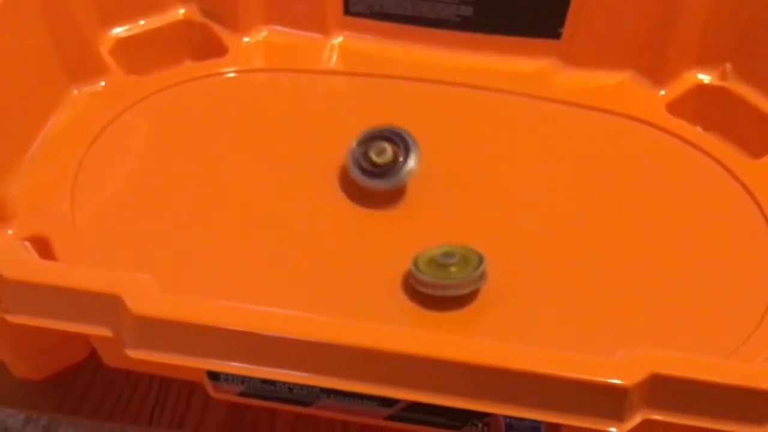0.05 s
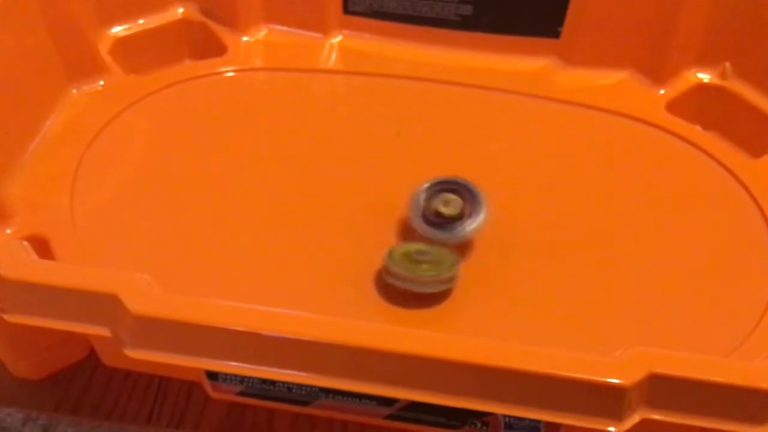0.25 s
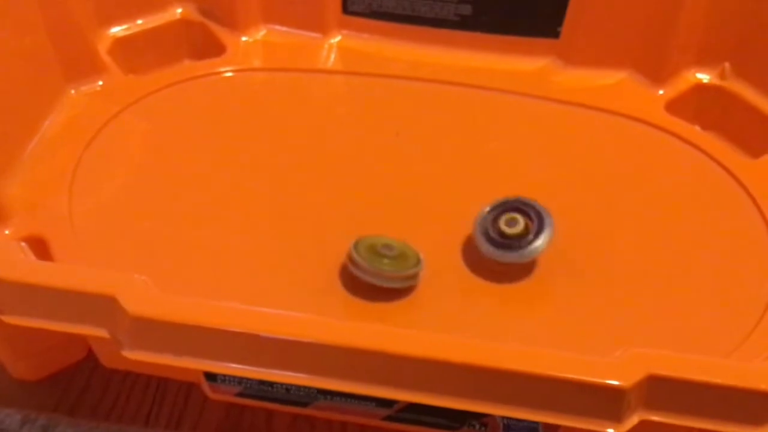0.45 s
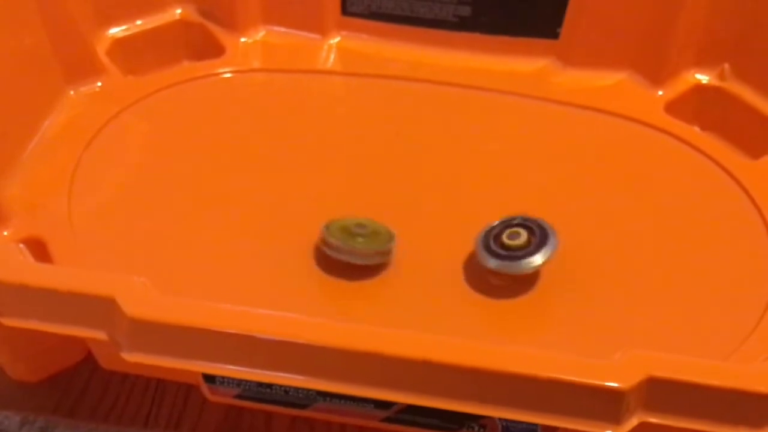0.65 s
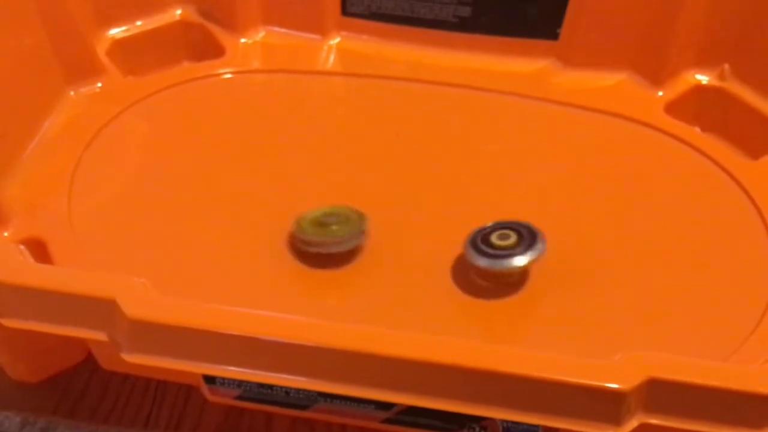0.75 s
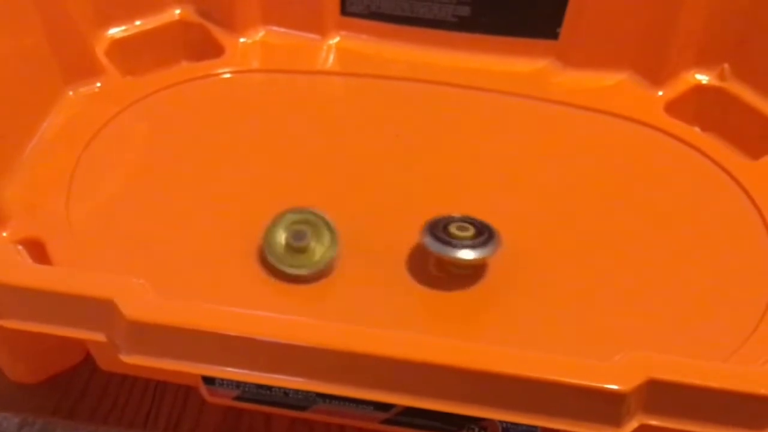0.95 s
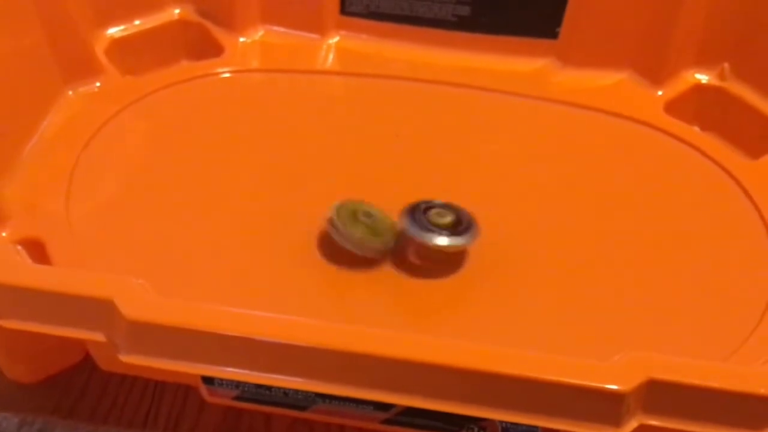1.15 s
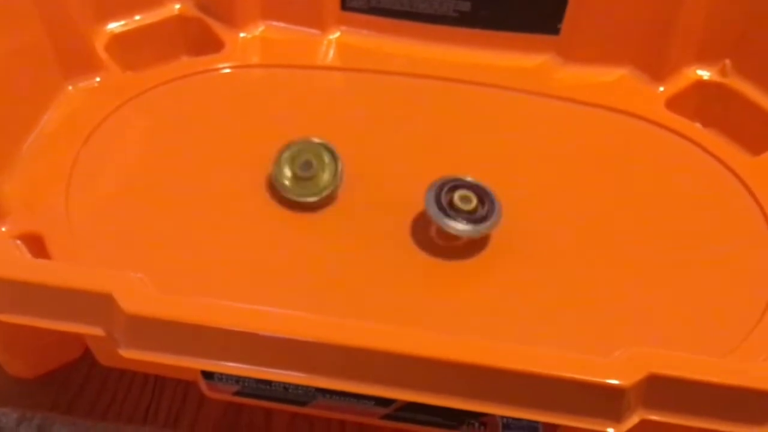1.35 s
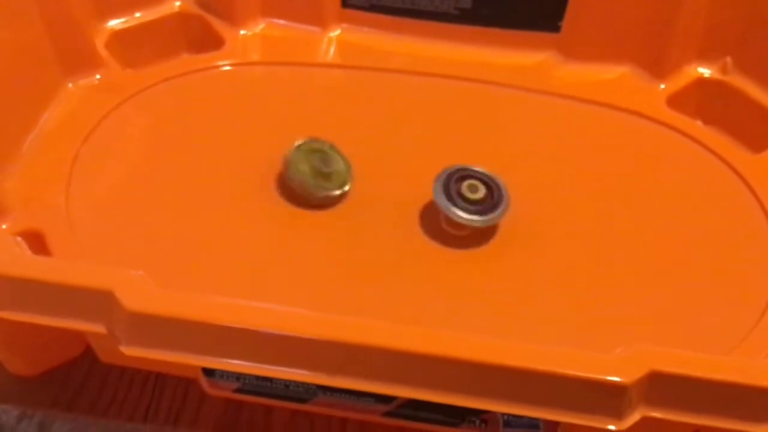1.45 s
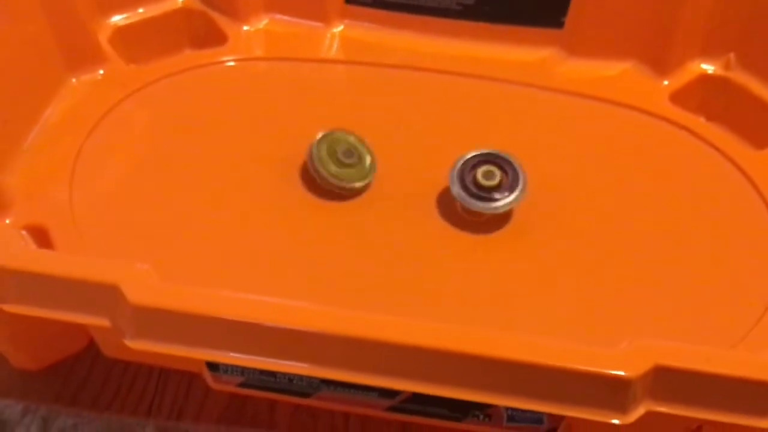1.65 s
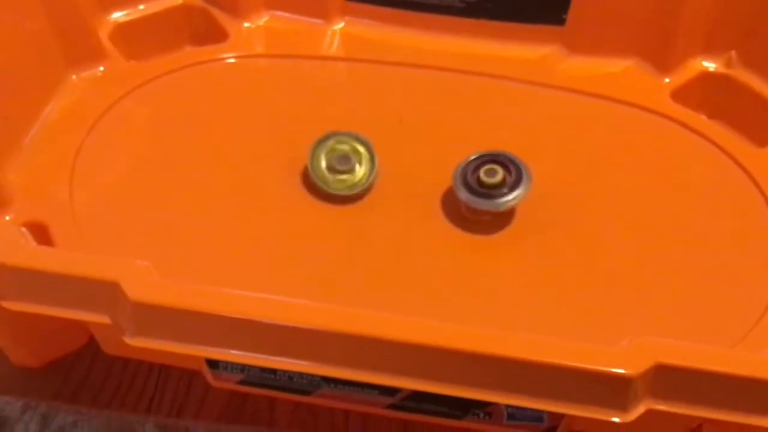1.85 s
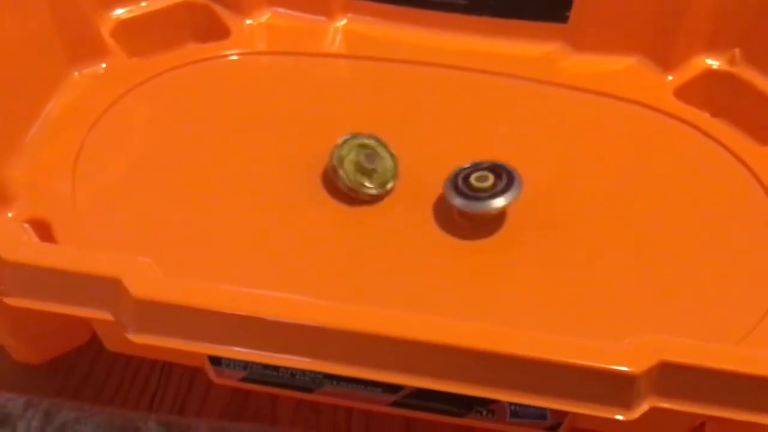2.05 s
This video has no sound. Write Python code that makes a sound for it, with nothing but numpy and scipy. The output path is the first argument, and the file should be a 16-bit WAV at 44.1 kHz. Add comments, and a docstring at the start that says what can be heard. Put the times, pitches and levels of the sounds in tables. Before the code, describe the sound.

Metal-rimmed toy tops clack together, then one grinds on its rim and slows to a rattle.

```python
"""Spinning tops clashing in an arena

Two toy tops with metal rims meet in a thin plastic arena, in a small room with a low hum.
They clash a few times, ringing and knocking the floor. One tips over, chatters, and grinds
round on its rim, biting once a turn and drumming the arena floor. As it slows, the grinding
breaks up into a quick rattle of separate taps."""
import sys
import numpy as np
from scipy import signal
from scipy.fft import rfft, irfft, next_fast_len
from scipy.io import wavfile
from scipy.ndimage import uniform_filter1d, map_coordinates

SR = 44100
rng = np.random.default_rng(int(sys.argv[2]) if len(sys.argv) > 2 else 0)


def persist_wave(psi):
    """Save psi, clipped to +-1, as 16-bit WAV."""
    counts = np.round(np.clip(psi, -1, 1) * 32767).astype(np.int16)
    wavfile.write(sys.argv[1], SR, np.atleast_2d(counts).T)


N = 92610
T = np.arange(N) / SR
BRIEF = T[:2048]  # time axis of one impact
# treble spectrum of the metal rim: f/Hz, level/dB
RIM_SHEEN = [(4000, -35), (6400, -10.5), (7900, -7.5), (8400, 8.5), (9100, -6.5), (10000, -11), (12000, -8),
             (13300, -1), (15800, -4.5)]


def amp(db):
    """Decibels to gain."""
    return 10 ** (np.asarray(db) / 20)


def unit(x):
    """Scale to rms 1."""
    return x / np.sqrt(np.mean(x ** 2) + 1e-20)


def along(points, hz):
    """Interpolate (f/Hz, value) points on a log axis."""
    f, v = np.transpose(points)
    return np.interp(np.log(hz + 1), np.log(f + 1), v)


def curve(rows):
    """Interpolate (t/s, value) points per sample."""
    return np.interp(T, *np.transpose(rows))


def wobble(knots_per_s):
    """Smooth random curve."""
    return map_coordinates(rng.standard_normal(4096), [T * knots_per_s + 2], mode="wrap")


def coloured(x, spectrum):
    """Minimum-phase filter; output at rms 1."""
    m = 2 * next_fast_len(len(x))
    cepstrum = irfft(np.log(amp(along(spectrum, np.fft.rfftfreq(m, 1 / SR)))), m)
    cepstrum[1:m // 2] *= 2
    cepstrum[m // 2 + 1:] = 0
    return unit(irfft(rfft(x, m) * np.exp(rfft(cepstrum)), m)[:len(x)])


def resonance(x, hz, width_hz):
    """One resonance; a second, wider stage steepens the skirts."""
    for spread in (1, 5):
        x = signal.lfilter(*signal.iirpeak(hz, hz / (spread * width_hz), SR), x)
    return x


def steadied(x, window_s):
    """Divide by the running rms."""
    power = uniform_filter1d(x * x, max(2, int(window_s * SR)))
    return x / np.sqrt(np.abs(power) + 1e-12)


def burst(spectrum, envelope):
    """Coloured noise burst with the energy of its envelope."""
    x = coloured(rng.standard_normal(len(envelope)) * envelope, spectrum)
    return x * np.sqrt(np.mean(envelope ** 2))


def swell(peak_s, sharp=1):
    """Envelope: rises to 1 at peak_s, then decays."""
    u = BRIEF / peak_s
    return (u * np.exp(1 - u)) ** sharp


def add(out, start_s, x):
    """Mix x into out."""
    part = out[max(0, round(start_s * SR)):][:len(x)]
    part += x[:len(part)]


def contact(t, rise_s=0.0012, fall_s=0.0048):
    """Force of one rim touch, t seconds after landing."""
    return np.minimum(t / rise_s, 1) * np.exp(-np.square(t / fall_s))


def room_hum(level_db=-49.5):
    """Steady low noise of the room."""
    # hum: f/Hz, level/dB
    spectrum = [(22, -51), (40, -31), (57, -1), (75, -2), (120, -3), (300, -10.5), (1500, -40), (5000, -61),
                (7000, -65), (16000, -60)]
    return amp(level_db) * coloured(rng.standard_normal(N), spectrum)


def echoes(x, walls_db=-16.5, tail_db=-13):
    """Early echoes off the arena walls, then the room's soft tail."""
    # room decay: f/Hz, T60/s
    t60 = [(100, 1), (1000, 0.28), (4000, 0.39), (14000, 0.45)]
    # tail at onset: f/Hz, level/dB
    spectrum = [(100, 2.5), (1000, 1.5), (4000, -3.5), (8500, 1.5), (12000, -4), (16000, -15)]
    hz, t, noise = signal.stft(rng.standard_normal(SR // 2), SR, nperseg=256)
    decay_db = along(spectrum, hz)[:, None] - 60 * t / along(t60, hz)[:, None]
    tail = signal.istft(noise * amp(decay_db), SR, nperseg=256)[1]
    tail *= np.minimum(T[:len(tail)] / 0.0021, 1)
    walls = rng.standard_normal(len(BRIEF)) * swell(0.0032)
    response = amp(tail_db) * tail / np.linalg.norm(tail)
    add(response, 0, amp(walls_db) * walls / np.linalg.norm(walls))
    return signal.fftconvolve(x, response)[:N]


def drumming():
    """Lowest mode of the arena floor, kept going by the tops."""
    # floor mode: t/s, level/dB
    levels = [(0, -52.5), (.23, -55.5), (.27, -39.5), (.36, -41), (.41, -47), (.48, -35.5), (.56, -75),
              (.73, -48.5), (.9, -52), (1.08, -34), (1.16, -45.5), (1.27, -34), (1.4, -42), (1.55, -35.5),
              (1.64, -52), (2.1, -50.5)]
    mode = resonance(rng.standard_normal(N), hz=159.8, width_hz=14.6)
    return amp(curve(levels)) * steadied(mode, 0.027)


def thuds():
    """Dull bumps of a top dropping back on the thin floor."""
    # landings: t/s, level/dB
    landings = [(0.2534, -38), (0.2872, -26.5), (.329, -31.5), (.366, -40), (1.502, -32.5), (1.943, -37),
                (2.084, -40.5)]
    # floor bump: f/Hz, level/dB
    spectrum = [(25, -42), (60, -1), (130, -4.5), (260, 2.5), (450, -8.5), (700, -11), (1400, -25),
                (6000, -62)]
    out = np.zeros(N)
    for start_s, db in landings:
        add(out, start_s, amp(db) * burst(spectrum, swell(0.0017, sharp=0.63)))
    return out


def chatter(bounces_per_s=480, peak_db=-26):
    """Fast uneven bounces swell into a short squeal of one resonance of the top."""
    start_s, peak_s, end_s = 0.601, 0.646, 0.663
    count = np.floor(np.cumsum(bounces_per_s * np.exp(0.28 * wobble(180))) / SR)
    bounces = np.diff(count, prepend=0) * amp(2.9 * wobble(200))
    ring = resonance(bounces, hz=3520, width_hz=120)
    swell_db = np.interp(T, (start_s, peak_s, end_s), (-9.5, 0, -4), left=-120, right=-120)
    return amp(peak_db + swell_db) * steadied(ring, 0.0085)


def taps(thump_delay_s=0.00202):
    """Each rim tap clicks and briefly rings the top; the arena answers with a soft thump."""
    # rim on floor: t/s, level/dB
    hits = [(.079, -41), (.096, -45.5), (.138, -42.5), (.423, -32.5), (.528, -34), (.545, -36), (.561, -34),
            (.570, -28.5), (.581, -31.5), (.666, -28), (.675, -26.5), (.687, -26.5), (.710, -26.5),
            (.721, -30), (.734, -29), (.746, -32), (.774, -34), (.783, -29.5), (.794, -27), (.810, -35),
            (.836, -30.5), (.868, -32), (.879, -28.5), (.926, -29), (1.024, -27), (1.058, -23.5),
            (1.074, -33), (1.082, -33.5), (1.093, -27), (1.148, -31), (1.163, -31), (1.175, -26),
            (1.191, -26.5), (1.204, -29), (1.222, -29.5), (1.235, -30), (1.246, -25), (1.258, -34),
            (1.271, -31), (1.290, -29.5), (1.302, -31), (1.3146, -27.5), (1.324, -36), (1.34, -32.5),
            (1.35, -30), (1.364, -34.5), (1.376, -35), (1.385, -32), (1.394, -28), (1.404, -29.5),
            (1.429, -35.5), (1.442, -36), (1.452, -35.5), (1.464, -33.5), (1.479, -34), (1.496, -36),
            (1.510, -38.5), (1.524, -36), (1.543, -34), (1.571, -38), (1.599, -43), (1.624, -46),
            (1.653, -48), (1.690, -39), (1.725, -38), (1.764, -36.5), (1.788, -35.5), (1.813, -37.5),
            (1.842, -36.5), (1.868, -40), (1.891, -38), (1.919, -34), (1.939, -34), (1.9695, -31.5),
            (1.9905, -34.5), (2.012, -34.5), (2.033, -43), (2.048, -40.5), (2.063, -44.5)]
    # timbre as the contact point shifts: t/s, sheen trim/dB, ring re tap/dB, ring f/Hz
    timbre = [(.42, -12, -7.5, 3740), (.55, 17.5, 2, 4400), (.68, 2, -10, 3530), (.79, -2, 3.5, 4770),
              (.92, 2, -12, 3460), (1.08, 4.5, 1.5, 4500), (1.18, -4, 1, 3580), (1.27, -0.5, -6, 4280),
              (1.94, 3.5, -13, 3680), (1.975, -4, 5.5, 3570)]
    # rim click: f/Hz, level/dB
    click_spectrum = [(400, -13), (1200, -5), (2000, -12), (2900, -5), (3600, 1), (4100, -0.5),
                      (4650, -1.5), (5400, -11.5), (6400, -28.5), (9000, -27.5), (16000, -69)]
    # arena thump: f/Hz, level/dB
    thump_spectrum = [(25, -18), (60, -27), (230, 5.5), (450, -10), (680, -7.5), (900, -12.5),
                      (1200, -10.5), (1800, -21), (6000, -49.5)]
    out = np.zeros(N)
    force = contact(BRIEF)
    times_s, *columns = np.transpose(timbre)
    for start_s, db in hits:
        trim_db, ring_db, ring_hz = (np.interp(start_s, times_s, c) for c in columns)
        tone = np.sin(2 * np.pi * ring_hz * rng.normal(1, 0.008) * BRIEF)
        ring = amp(ring_db) * swell(0.00083, sharp=0.81) * tone
        click = burst(click_spectrum, force)
        sheen = amp(trim_db - 22) * burst(RIM_SHEEN, force)
        add(out, start_s, amp(db) * (click + ring + sheen))
        thump_db = -44.5 + 0.44 * (db + 38)  # grows more slowly than the tap
        add(out, start_s + thump_delay_s, amp(thump_db) * burst(thump_spectrum, swell(0.0033)))
    return out


def grit(spiky_db):
    """Rough contact: noise with a fast level flicker, rms 1."""
    return unit(rng.standard_normal(N) * amp(spiky_db * np.tanh(wobble(700))))


def rim_pressure(bite_at_s=0.879, scatter_db=3.5):
    """The rim bears down once a turn, unevenly, and rubs in between."""
    # spin: t/s, rate/(turns/s)
    spin = [(0, 104), (.6, 97), (.8, 96.5), (.9, 93.6), (1.08, 84), (1.25, 81), (1.4, 78), (1.52, 64),
            (1.6, 48), (2.1, 57)]
    # rubbing between bites: t/s, level/dB
    rubbing = [(.7, -8.5), (.78, -2), (1.0, -3), (1.22, -7.5)]
    turns_per_s = curve(spin)
    turns = np.cumsum(turns_per_s * (1 + 0.006 * wobble(60.8))) / SR
    turns -= np.interp(bite_at_s, T, turns)
    strength = amp(scatter_db * rng.uniform(-1.3, 1, size=512))[np.floor(turns).astype(int)]
    return strength * contact(turns % 1 / turns_per_s) + amp(curve(rubbing))


def rolling(pressure, even_at_s=0.99, even_half_width_s=0.21):
    """Grit shakes the arena; where the rim rolls most evenly it hums on a sinking pitch."""
    # arena response: f/Hz, level/dB
    spectrum = [(25, -82), (60, -29), (130, -9.5), (230, -2.5), (310, -2.5), (365, 2.5), (460, -6.5),
                (570, -0.5), (675, 5.5), (850, -7.5), (1190, -1.5), (1330, -13), (1900, -15.5),
                (2500, -12.5), (4000, -24.5), (8000, -79)]
    # fundamental of the hum: t/s, f/Hz
    pitch = [(.78, 100), (.92, 87), (1.12, 72.5)]
    # rolling: t/s, level/dB
    levels = [(0, -54), (.06, -50.5), (.15, -54), (.23, -69), (.28, -42), (.36, -45), (.5, -47.5),
              (.57, -53.5), (.68, -42.5), (.79, -33.5), (.89, -34.5), (.96, -37), (1.09, -32.5),
              (1.16, -44), (1.27, -35), (1.42, -41.5), (1.56, -44), (1.63, -58), (1.82, -58.5), (1.96, -52),
              (2.1, -52)]
    rumble = coloured(grit(spiky_db=3.5) * np.sqrt(pressure), spectrum)
    phase = 2 * np.pi * np.cumsum(curve(pitch)) / SR
    evenness = np.exp(-((T - even_at_s) / even_half_width_s) ** 4)
    tones = sum(amp(db + 2.5 * wobble(30.4)) * np.sin(order * phase + 0.32 * wobble(40.1))
                for order, db in ((4, -5), (5, -8.5)))
    return amp(curve(levels)) * steadied(rumble + evenness * tones, 0.0574)


def scraping(pressure, swing_db=5.5, swings_per_s=16.48):
    """Friction excites the top's resonances, which come and go as it turns."""
    # rim friction: f/Hz, level/dB
    spectrum = [(500, -28.5), (1500, -3.5), (2500, -7), (3200, 0), (3600, -5), (4150, -1.5), (4700, -7),
                (5400, -13.5), (6400, -28.5), (7700, -26), (8400, -27), (10000, -33), (15800, -30)]
    # modes of the top: f/Hz, width/Hz, relative level/dB
    modes = [(3360, 87, -11.5), (3640, 170, -10), (4210, 120, -22.5), (4600, 70, -13), (1916, 72, -20),
             (2270, 120, -24.5)]
    # scraping: t/s, level/dB
    levels = [(0, -56), (.14, -58), (.22, -62), (.29, -46), (.43, -61), (.51, -57.5), (.6, -34.5),
              (.655, -30), (.675, -48), (.78, -32), (.88, -35.5), (.98, -36), (1.09, -38.5), (1.2, -43.5),
              (1.38, -46.5), (1.53, -54), (1.64, -62), (1.85, -60), (2.1, -51.5)]
    friction = grit(spiky_db=1.5) * pressure
    scrape = coloured(friction, spectrum)
    for hz, width_hz, db in modes:
        scrape += amp(db + swing_db * wobble(swings_per_s)) * unit(resonance(friction, hz, width_hz))
    return amp(curve(levels)) * steadied(scrape, 0.059)


def sizzle(pressure):
    """Treble hiss of the metal rim rubbing."""
    # sizzle: t/s, level/dB
    levels = [(0, -82), (.23, -79), (.27, -50), (.36, -68), (.5, -81), (.6, -53.5), (.9, -60.5),
              (1.05, -61), (1.18, -52), (1.35, -66), (1.6, -77), (2.1, -68)]
    return amp(curve(levels)) * coloured(grit(spiky_db=3.0) * pressure, RIM_SHEEN)


def grinding():
    """A top running on its rim: one pulsing pressure drives roll, scrape and sizzle."""
    pressure = rim_pressure()
    return rolling(pressure) + scraping(pressure) + sizzle(pressure)


def clashes(knock_delay_s=0.0028):
    """The rims bite for a few ms and ring roughly in two modes; the tips then knock the arena."""
    # top on top: t/s, rise/s, crack/dB, low mode f/Hz, level/dB, high mode f/Hz, level/dB,
    # fizz/dB, knock/dB, arena mode f/Hz, level/dB
    hits = [(0.2462, .002, -18.5, 3920, -11.5, 4330, -29, -15, -22, 1140, -26),
            (.2800, 0.0025, -31.5, 3700, -34, 4130, -32, -54, -44, 680, -44),
            (0.325, 0.00096, -20, 3570, -20, 4574, -23, -33, -47, 294.4, -44),
            (.3540, .0021, -31, 3730, -29, 4150, -29, -50, -35, 706, -37),
            (0.3954, 0.0023, -23.5, 3880, -29, 4060, -11.5, -46, -28, 1093, -28.5),
            (1.1128, 0.0028, -16, 3653, -15.5, 4540, -13, -21, -24, 657, -26),
            (1.1808, .0028, -28.5, 3700, -28, 4460, -25, -54, -28, 1390, -31.5)]
    # rim crack: f/Hz, level/dB
    crack_spectrum = [(500, -29), (2000, -19), (2900, -3), (3900, 10), (4700, 2.5), (5400, -2.5),
                      (6400, -18), (7400, -21.5), (8600, -10.5), (10500, -30), (16000, -49)]
    # metallic fizz: f/Hz, level/dB
    fizz_spectrum = [(5000, -35), (8500, -11.5), (10500, -14), (11800, -13), (12800, -3), (14200, -5),
                     (14900, -3), (15900, -1)]
    # arena knock: f/Hz, level/dB
    knock_spectrum = [(20, -40), (60, -16), (160, -3.5), (250, 2.5), (500, -6.5), (750, -2), (1150, 2.5),
                      (1600, -3), (2000, 0.5), (3500, -7.5), (8000, -29.5)]
    out = np.zeros(N)
    for (start_s, rise_s, crack_db, low_hz, low_db, high_hz, high_db,
         fizz_db, knock_db, arena_hz, arena_db) in hits:
        bite = swell(rise_s, sharp=1.23)
        ring = sum(amp(db) * np.sin(2 * np.pi * hz * BRIEF + 0.22 * wobble(1230)[:len(BRIEF)])
                   for hz, db in ((low_hz, low_db), (high_hz, high_db)))
        crack = amp(crack_db) * burst(crack_spectrum, bite)
        fizz = amp(fizz_db) * burst(fizz_spectrum, bite)
        add(out, start_s, swell(rise_s, sharp=2.8) * ring + crack + fizz)
        knock = amp(knock_db) * burst(knock_spectrum, swell(0.0013, sharp=0.4))
        arena_ring = amp(arena_db) * swell(0.002, sharp=0.49) * np.sin(2 * np.pi * arena_hz * BRIEF)
        add(out, start_s + knock_delay_s, knock + arena_ring)
    return out


def scene():
    """Tops, echoes and floor drumming over the room hum; mono."""
    tops = clashes() + taps() + thuds() + grinding() + chatter()
    return (tops + echoes(tops) + drumming() + room_hum())[None]


def record(dry):
    """Microphone band limit: a steep low-pass."""
    cutoff_hz = 15800
    m = next_fast_len(N + 8192)
    hz = np.fft.rfftfreq(m, 1 / SR)
    return irfft(rfft(dry, m) / np.sqrt(1 + (hz / cutoff_hz) ** 200), m)[..., :N]


dry = scene()
out = record(dry)
persist_wave(out)
```